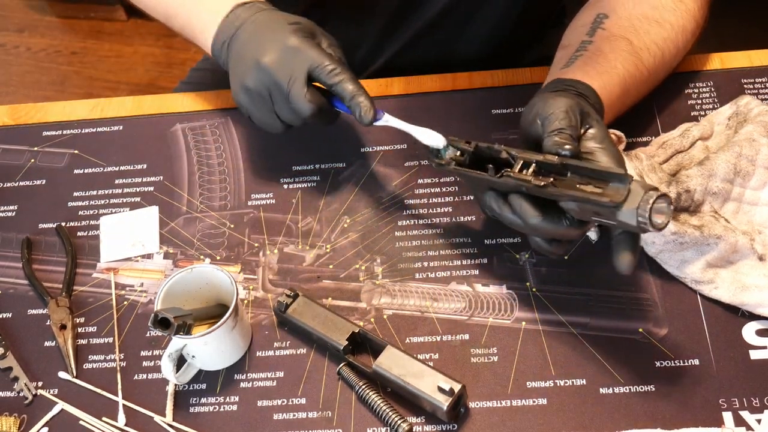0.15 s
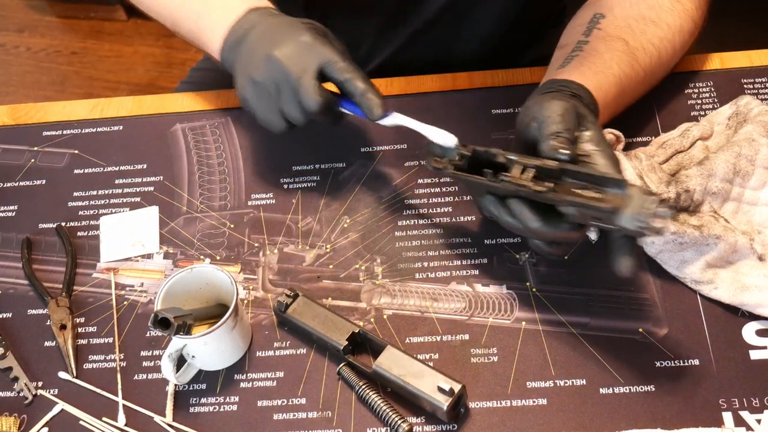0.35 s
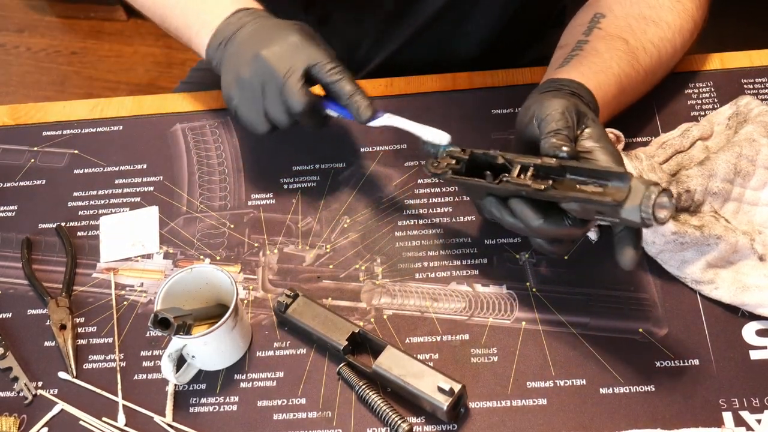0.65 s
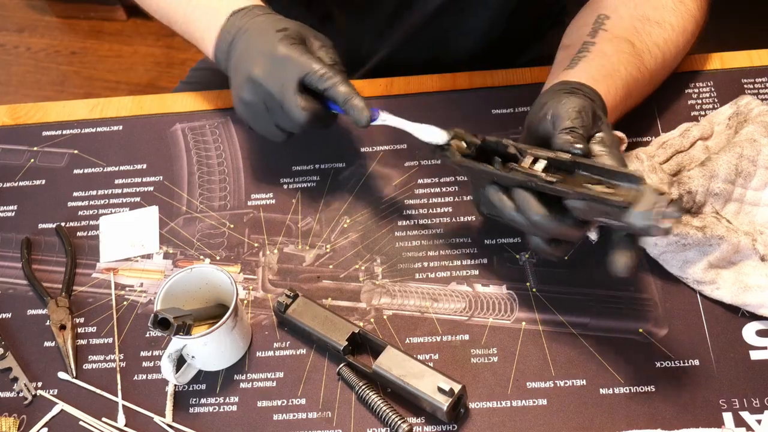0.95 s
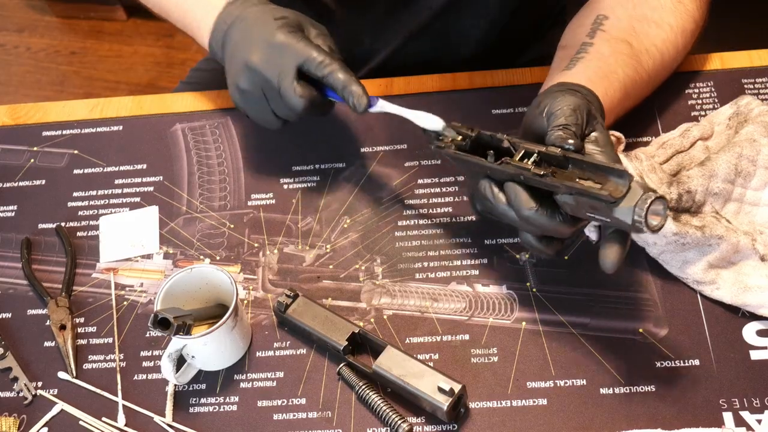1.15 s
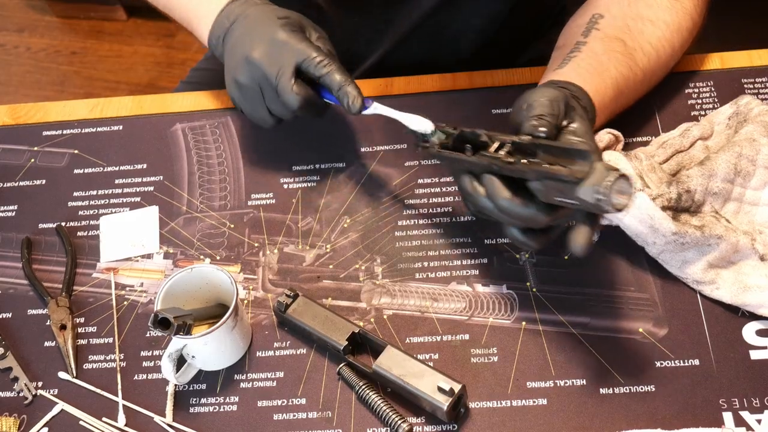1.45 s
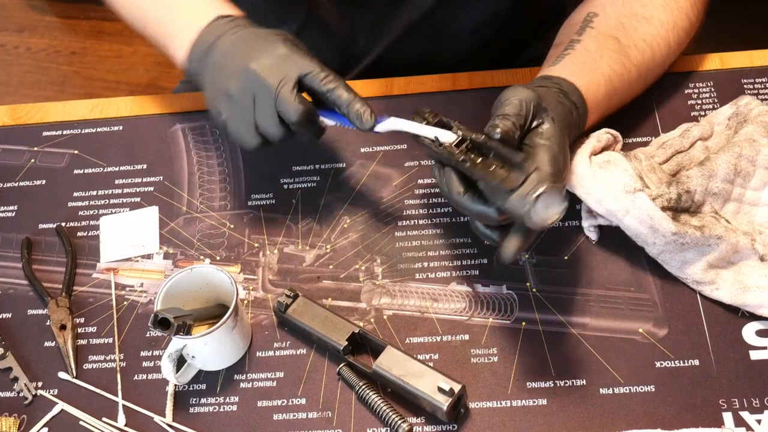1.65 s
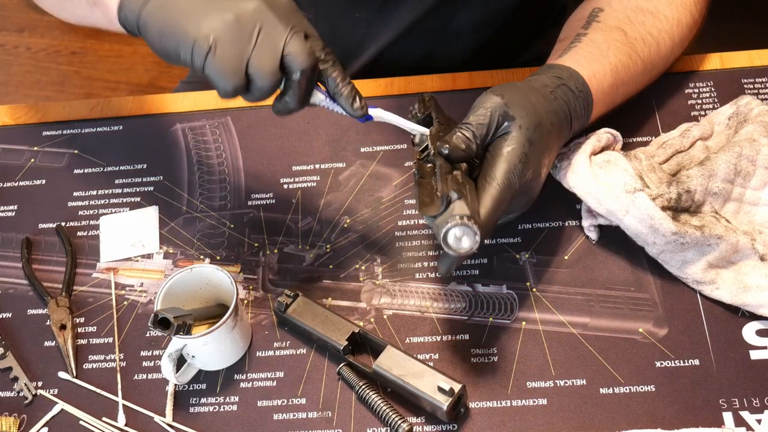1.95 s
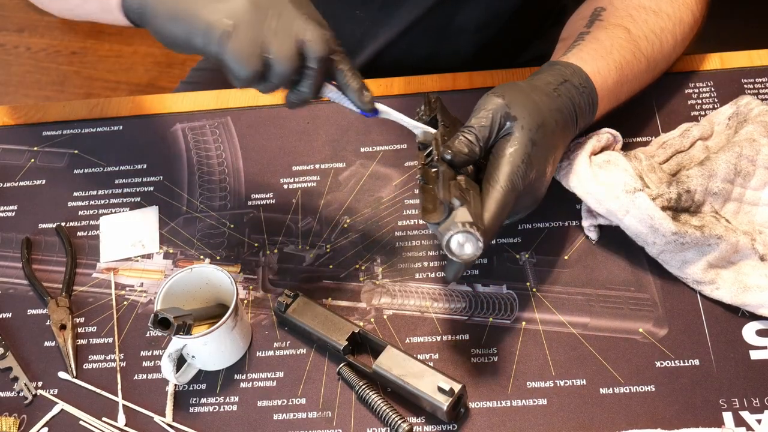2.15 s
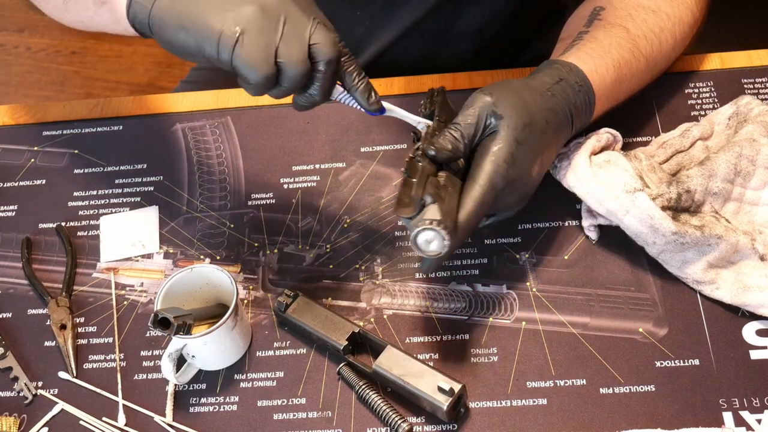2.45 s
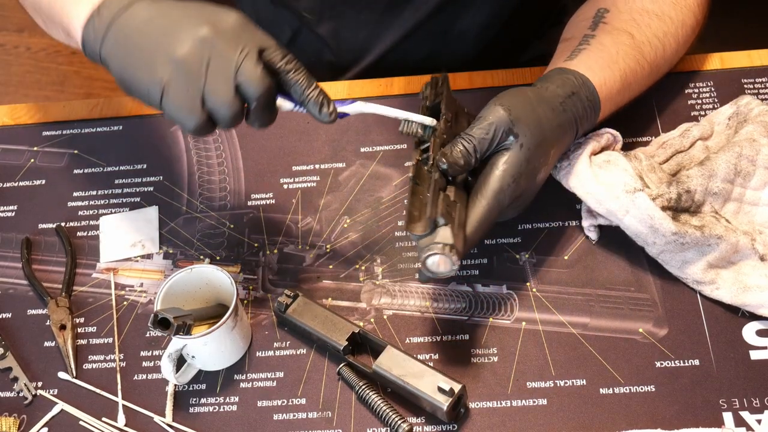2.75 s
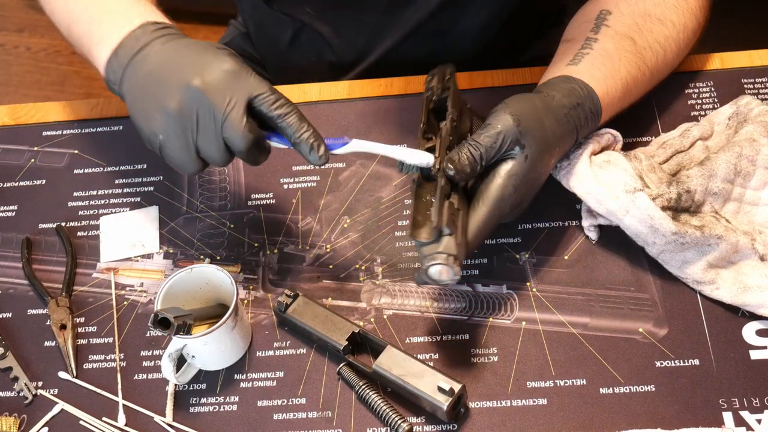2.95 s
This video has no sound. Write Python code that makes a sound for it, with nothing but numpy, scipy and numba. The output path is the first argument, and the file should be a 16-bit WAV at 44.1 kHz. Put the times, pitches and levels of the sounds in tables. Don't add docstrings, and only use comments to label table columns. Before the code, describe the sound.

A stiff wet toothbrush scrubs a hollow pistol frame in quick, rasping strokes, close to the microphone in a small humming room; after some brush-head knocks, a sprung steel part snaps very loudly near the end.

```python
import sys
import numpy as np
from scipy import signal
from scipy.fft import rfft, irfft
from scipy.io import wavfile
from scipy.ndimage import uniform_filter1d
from numba import njit

SR = 44100
rng = np.random.default_rng(int(sys.argv[2]) if len(sys.argv) > 2 else 0)


def transcribe(signal):
    frames = np.atleast_2d(signal).T
    limited = np.clip(frames, -1, 1)
    pcm = np.round(limited * 32767).astype(np.int16)
    wavfile.write(sys.argv[1], SR, pcm)


def volts(x):
    e = np.asarray(x, float) / 20
    return 10 ** e


N = 136710


def level(x, db):
    return x * volts(db) / np.sqrt(np.mean(x ** 2))


def peak(x):
    return x / np.abs(x).max()


def curve(points, hz):
    p = np.array(points, float)
    return np.interp(np.log(np.maximum(hz, 1)), np.log(p[:, 0]), p[:, 1])


def colour(x, points):
    n = x.shape[-1]
    hz = np.arange(n // 2 + 1) * SR / n
    return irfft(rfft(x) * volts(curve(points, hz)), n)


def band(x, hz, width):
    return signal.lfilter(*signal.iirpeak(min(hz, .45 * SR), hz / width, fs=SR), x)


def band_twice(x, hz, width):
    return band(band(x, hz, width), hz, width)


def walk(rate):
    k = int(SR / rate)
    steps = np.repeat(rng.standard_normal(N // k + 1), k)
    return 0.86 * uniform_filter1d(uniform_filter1d(steps, k), k)[:N]


# (frequency [Hz], density [dB per Hz])
ROOM_TONE_MID = [(25, -12), (70, -4.5), (130, -3), (360, -3), (700, -6), (1700, -7.5), (3500, -9),
                 (15500, -17.5)]
# (frequency [Hz], density [dB per Hz])
ROOM_TONE_SIDE = [(25, -12), (70, 1), (180, -6.5), (370, -5), (700, -8), (2900, -11.5), (8000, -15),
                  (15500, -16.5)]
# (time [s], level [dB])
BENCH_JOLTS = [(.13, -38), (.4, -34), (.56, -39), (.68, -35), (.88, -34), (1.06, -36.5), (1.2, -51),
               (1.35, -40), (1.46, -36), (1.6, -39), (1.7, -41), (1.9, -44), (2.22, -40.5), (2.4, -49),
               (2.93, -46)]


def hum():
    shake_hz, shake_width_hz, jolt_s, thud_hz = 86.1, 18.3, 0.053, 141
    t = np.arange(N) / SR
    mid = level(colour(rng.standard_normal(N), ROOM_TONE_MID), -43.5) * volts(walk(3.93))
    side = level(colour(rng.standard_normal(N), ROOM_TONE_SIDE), -45)
    jolts = volts(-52.5) + sum(volts(db) * np.exp(-((t - s) / jolt_s) ** 2) for s, db in BENCH_JOLTS)
    sway = np.sin(2 * np.pi * np.cumsum(shake_hz + shake_width_hz / 4 * walk(12)) / SR)
    rattle = band(rng.standard_normal(N), shake_hz, shake_width_hz)
    rattle = level(band(rattle, shake_hz, 2 * shake_width_hz), -8)
    shake = jolts * (sway + rattle)
    thud = jolts * level(band_twice(rng.standard_normal(N), thud_hz, thud_hz), -18.5)
    return mid + thud + volts(-17) * shake + (side + shake) * np.array([[1], [-1]])


def spread(h):
    width = 0.6
    h = h[0] + width * h[1] * np.array([[1], [-1]])
    return h / np.sqrt(np.sum(h ** 2) / 2)


def early_echo():
    decay_s = 0.0025
    noise = rng.standard_normal((2, 1024))
    return volts(-7.5) * spread(noise * np.exp(-np.arange(1024) / SR / decay_s))


# (frequency [Hz], t60 [s])
ROOM_DECAY = [(300, 0.27), (1500, .5), (4000, .52), (8000, 0.3), (14000, 0.3)]


def room():
    n, tail = int(.7 * SR), 0
    t = np.arange(n) / SR
    for hz in 180 * 2 ** np.arange(0, 6.6, .5):
        decay = np.exp(-np.log(1000) * t / curve(ROOM_DECAY, hz))
        tail = tail + band(rng.standard_normal((2, n)), hz, hz / 1.94) * decay
    return spread(tail * np.clip(t / 0.002, 0, 1))


# (frequency [Hz], level [dB])
SNAP_COLOUR = [(1100, -27.5), (1800, -11.5), (3500, -3.5), (4500, -5), (5900, 2), (7300, -7), (10500, -9.5),
               (15500, -30)]


def snap():
    snap_s, hold_s, decay_s, thump_s = 2.6034, 0.00088, .0008, 0.00076
    t = np.arange(N) / SR - snap_s
    noise = rng.standard_normal(N) * (t >= 0) * np.exp(-np.clip(t - hold_s, 0, 1) / decay_s)
    burst = band(noise, 4150, 1530) + band(noise, 7070, 3300)
    burst = burst_top(noise, burst)
    burst = burst + volts(-28) * (t >= 0) * (t < thump_s) * np.sin(np.pi * t / thump_s)
    tone = colour(1. * (np.arange(N) == int(snap_s * SR)), SNAP_COLOUR)
    tone = tone * np.sqrt(np.sum(burst ** 2) / np.sum(tone ** 2))
    return volts(20.5) * burst, volts(20.5) * tone


def burst_top(noise, burst):
    return burst + volts(1.5) * band_twice(noise, 10730, 5400)


def ring(modes, chance):
    scatter_db, detune = 2, .02
    t, total = np.arange(2048) / SR, 0
    for k, ((hz, db, t60), c) in enumerate(zip(modes, chance)):
        tone = np.sin(2 * np.pi * hz * (1 + detune * c[1]) * t)
        total = total + (-1) ** k * volts(db + scatter_db * c[0]) * tone * np.exp(-np.log(1000) * t / t60)
    return total


# (frequency [Hz], level [dB], t60 [s])
SHELL = [(533, -17.5, 0.009), (980, -7, 0.02), (1476, 3, 0.021), (1622, 1, 0.032), (1889, 7, 0.0095),
         (2480, -7.5, 0.0065)]
# (frequency [Hz], level [dB], t60 [s])
STEEL_RAILS = [(2756, -37, 0.011), (3097, 4, 0.0098), (3440, 5.5, 0.013), (3765, 7, 0.008),
               (4516, 1, 0.008), (5130, 4, 0.0042), (6450, 4.5, 0.0034)]
# (time
# [s], peak level [dB], hollow ring [dB], crack [dB])
KNOCKS = [(0.1075, -22.5, -0.5, -8), (.25, -24, -5, -4), (0.293, -16, -10, 9), (1.1448, -22, -12, 5.5),
          (1.393, -20.5, 2, -4), (1.5355, -9.5, -11, -4), (1.5424, -15, -7, 3),
          (1.5717, -10.5, -1.5, 1), (1.5781, -13, 0.5, 0), (1.582, -16, 2, -8), (1.6177, -22, 6, -10),
          (1.6779, -10.5, 2.5, 2.5), (1.699, -8.5, -3.5, 4), (1.818, -19.5, 3, -9),
          (1.9743, -23.5, -5.5, -3), (2.1914, -31.5, 6, -8), (2.3106, -18, 2, 2.5),
          (2.419, -18.5, 1, -12), (2.4362, -21, 0, -6), (2.4438, -12, 2.5, 3), (2.5664, -14.5, -6, 6),
          (2.5801, -20, 7, -6), (2.5975, -10, 5, 9), (2.6006, -11.5, 5, 4), (2.6085, -1, -5, 5),
          (2.6142, 0, -5, 8), (2.9517, -19, 4, 4), (2.9728, -10, 4, 9), (3.0575, -23.5, 3, 5.5),
          (3.0902, -28, 10, 17)]


def knocks():
    thock_hz, crack_s = 670, 0.00078
    out, t = np.zeros(N + 2048), np.arange(2048) / SR
    thock = peak(band(np.exp(-t / 0.00035), thock_hz, thock_hz))
    for s, db, hollow_db, crack_db in KNOCKS:
        chance = rng.standard_normal((2, len(STEEL_RAILS), 2))
        puff = rng.standard_normal(2048) * np.minimum(t / 0.00062, 1) * np.exp(-t / crack_s)
        crack = peak(band(band(puff, 6200, 7600), 7500, 9000))
        hit = peak(ring(STEEL_RAILS, chance[0])) + volts(hollow_db - 7) * peak(ring(SHELL, chance[1]))
        hit = peak(hit * np.minimum(t / 0.00043, 1))
        hit = hit + volts(hollow_db - 17) * thock + volts(crack_db - 6) * crack
        i = int(s * SR)
        out[i:i + 2048] += volts(db) * peak(hit)
    return out[:N]


def roaming(db=0):
    spot_db, spots_per_s = 2.5, 16
    return volts(db + spot_db * walk(spots_per_s))


def flick_clicks():
    flicks_per_s, spread_db, judder_db = 7000, 3.0, 3
    happens = rng.random(N) < flicks_per_s / SR
    size = volts(spread_db * np.minimum(rng.exponential(size=N), 5))
    sign = np.sign(rng.standard_normal(N))
    return level(happens * size * sign * volts(judder_db * walk(90)), 0)


def scrubbed_body(modes, drive):
    rings = [(-1) ** k * ring([m], np.zeros((1, 2)))[:1024] for k, m in enumerate(modes)]
    driven = sum(signal.oaconvolve(drive * roaming(), h)[:N] for h in rings)
    return driven / np.sqrt(np.sum(sum(rings) ** 2))


# (frequency [Hz], width [Hz], level [dB])
BRISTLE_TIPS = [(6240, 7900, -1.5), (9360, 4600, 24), (10800, 2600, -31), (13400, 4300, -4)]
# (time [s], length [s], level [dB], bristle hiss [dB], hollow ring [dB])
BRUSH_STROKES = [(-.005, 0.066, -28.5, -5, -0.5), (0.08, .11, -29.5, -0.5, -0.5),
                 (0.213, 0.12, -32.5, -4.5, -1), (0.33, 0.091, -30.5, -1, 3), (0.472, 0.11, -33.5, -4, 1.5),
                 (0.578, 0.12, -36, -1.5, 1), (0.711, 0.14, -38.5, -5, 1.5), (0.853, 0.096, -36, 0, 0.5),
                 (0.955, 0.15, -39, 0.5, 1), (1.092, 0.13, -41.5, 2.5, -8), (1.251, 0.12, -34, -3, -1.5),
                 (1.367, 0.11, -31, -2.5, -1.5), (1.506, 0.12, -32.5, -0.5, 5), (1.98, 0.15, -52, 5, 12),
                 (2.398, 0.12, -37.5, -10, 10), (2.546, 0.087, -29.5, -8.5, 6),
                 (2.935, 0.033, -35, -5.5, 1), (2.954, 0.09, -43.5, -19, 16)]


def scrub():
    rise_share = 0.39
    t, strokes = np.arange(N) / SR, np.zeros((3, N))
    for start, length, db, hiss_db, hollow_db in BRUSH_STROKES:
        u = np.clip((t - start) / length, 0, 1)
        swell = np.sin(np.pi / 2 * np.minimum(u / rise_share, (1 - u) / (1 - rise_share)))
        strokes += swell * volts(db + np.array([[0], [hiss_db], [hollow_db]]))
    rail_env, hiss_env, shell_env = strokes
    flicks, tips = flick_clicks(), 0
    for k, (hz, width, db) in enumerate(BRISTLE_TIPS):
        later = np.roll(flicks, 37 * k + 37)
        tips = tips + roaming(db) * band_twice(later, hz, width)
    rails = scrubbed_body(STEEL_RAILS, flicks * rail_env)
    shell = volts(-8.5) * scrubbed_body(SHELL, flicks * shell_env)
    return volts(-4) * (rails + shell + level(tips, 2) * hiss_env)


def echo(x, h):
    return signal.fftconvolve(x[None], h, axes=1)[:, :N]


def scene():
    work = scrub() + knocks()
    burst, tone = snap()
    work = signal.sosfilt(signal.butter(2, 250, "high", fs=SR, output="sos"), work)
    direct = work + burst
    to_room = volts(-5.5) * work + volts(-13) * tone
    return direct + echo(direct, early_echo()) + echo(to_room, room()) + hum()


@njit
def follow(x, top, attack, release):
    g, e = np.empty(len(x)), top
    for i in range(len(x)):
        e = e + (x[i] - e) * attack if x[i] > e else max(e * release, top)
        g[i] = top / e
    return g


def band_limit(x):
    return signal.sosfilt(signal.butter(12, 16420, fs=SR, output="sos"), x)


def record(dry):
    limit_db, attack_s, release_db_per_s, top_hz = -3.5, 0.0019, 87.5, 15720
    loudest = np.abs(dry).max(axis=0)
    gain = follow(loudest, volts(limit_db), 1 / (attack_s * SR), volts(-release_db_per_s / SR))
    clipped = np.clip(dry * gain, -1, 1)
    cut = signal.sosfilt(signal.ellip(12, .5, 60, top_hz, fs=SR, output="sos"), clipped)
    return band_limit(np.clip(cut, -1, 1))


dry = scene()
out = record(dry)
transcribe(out)
```